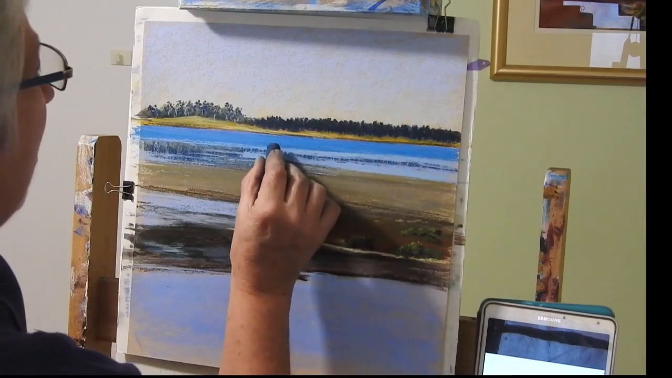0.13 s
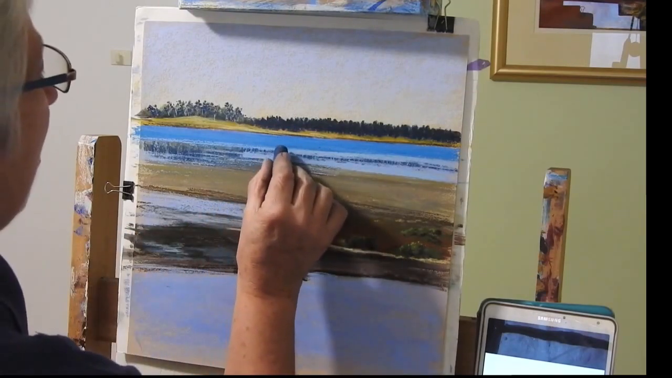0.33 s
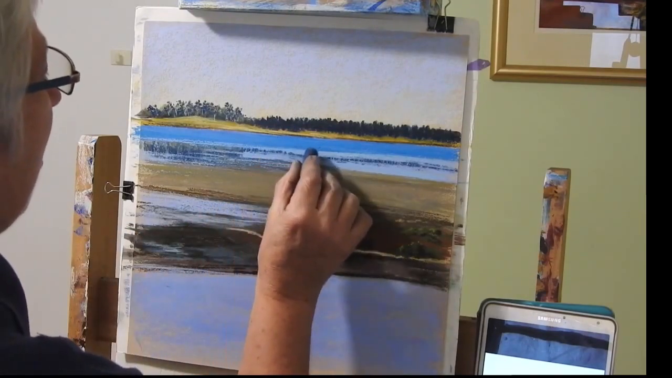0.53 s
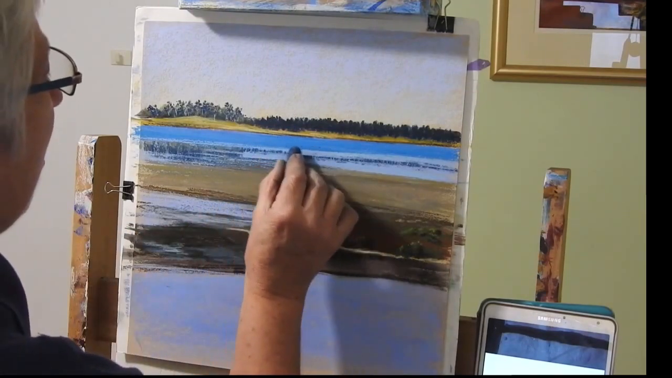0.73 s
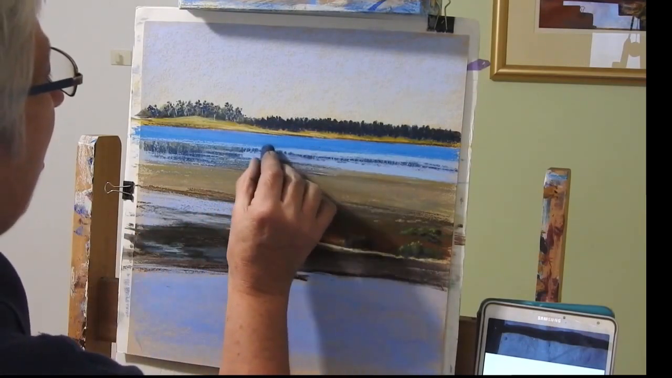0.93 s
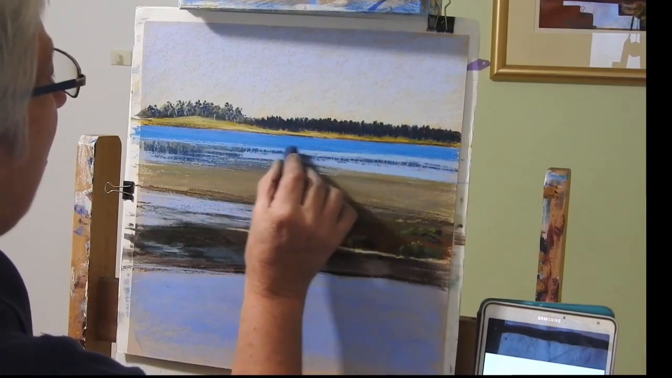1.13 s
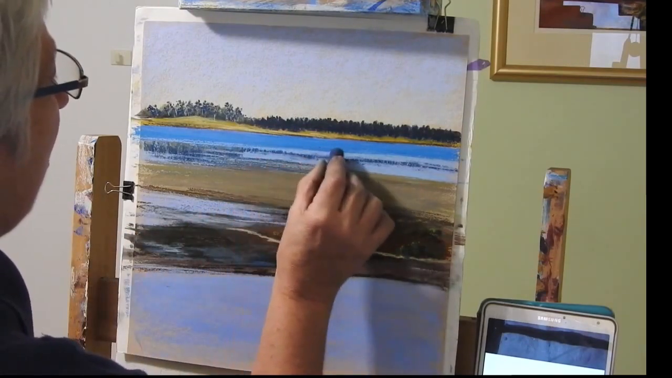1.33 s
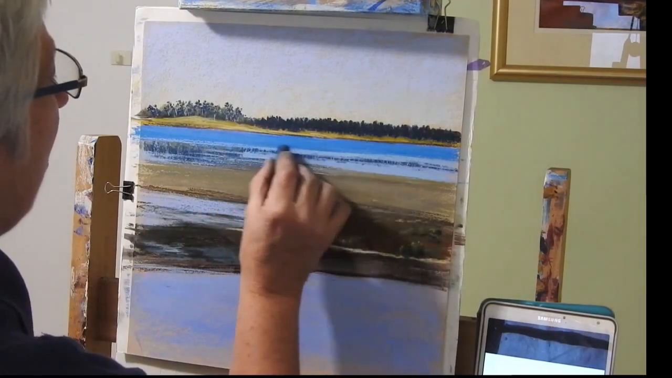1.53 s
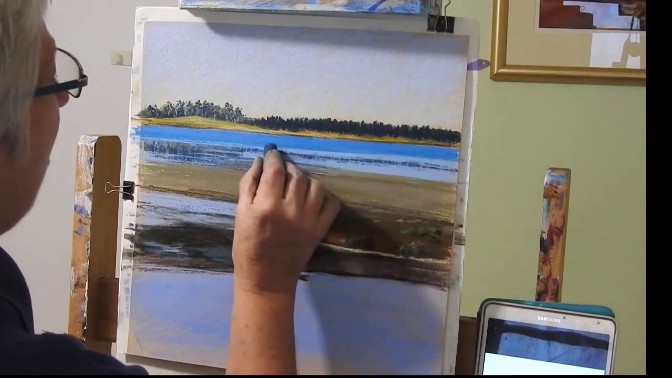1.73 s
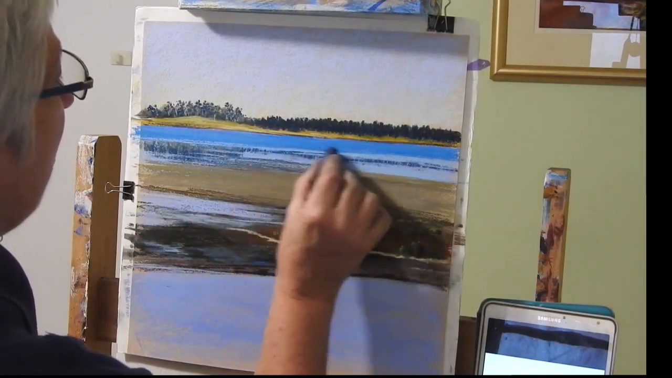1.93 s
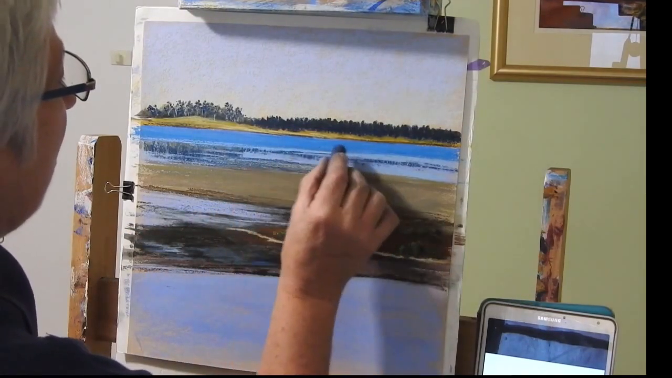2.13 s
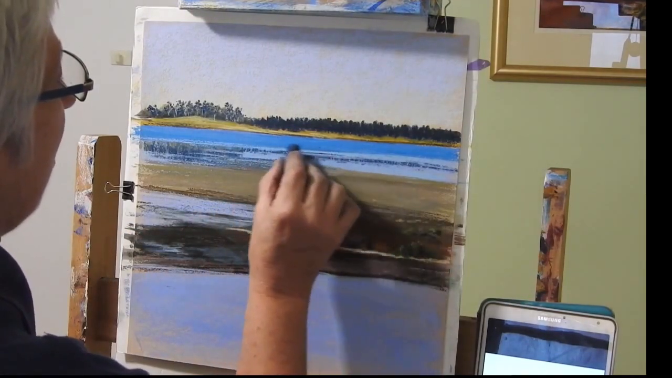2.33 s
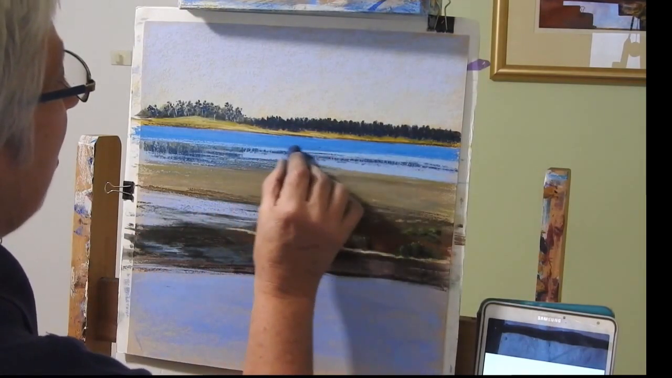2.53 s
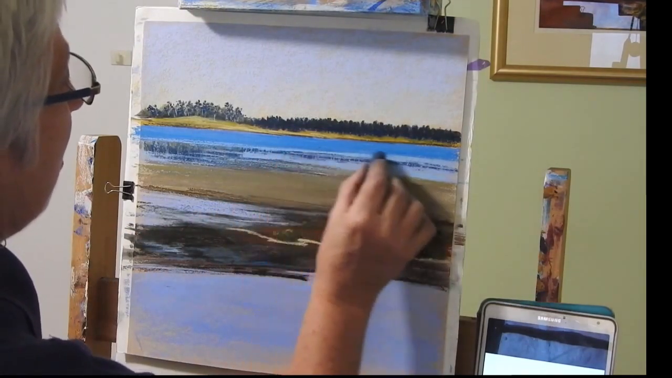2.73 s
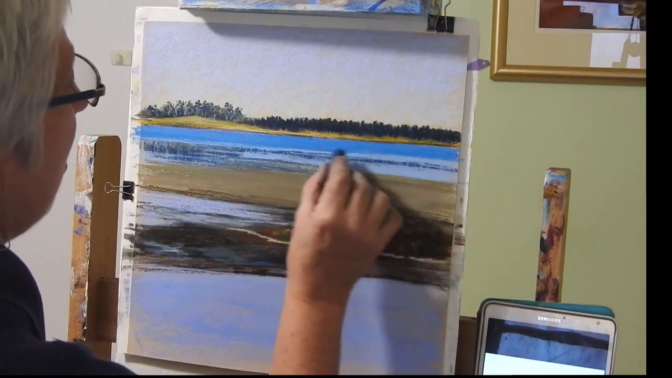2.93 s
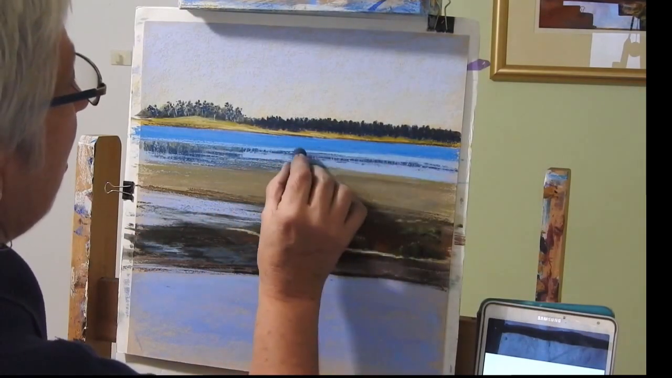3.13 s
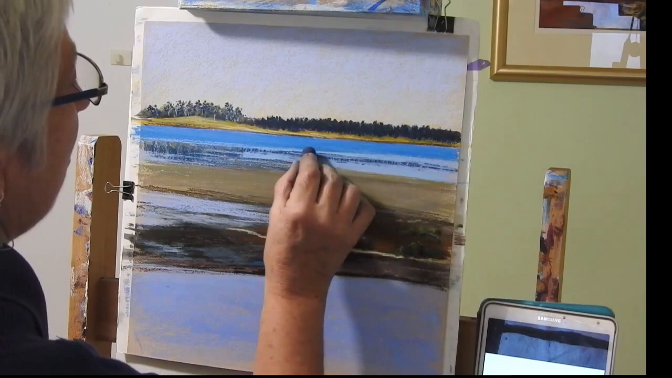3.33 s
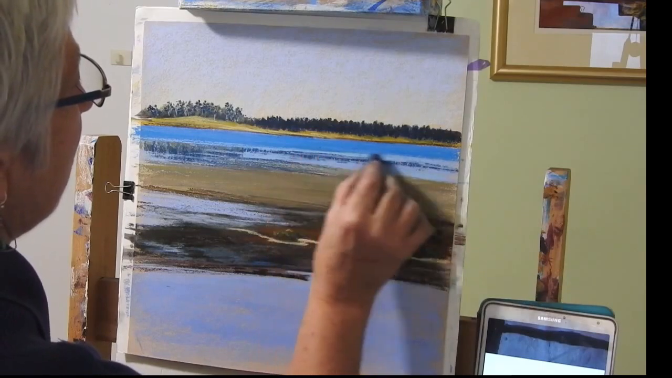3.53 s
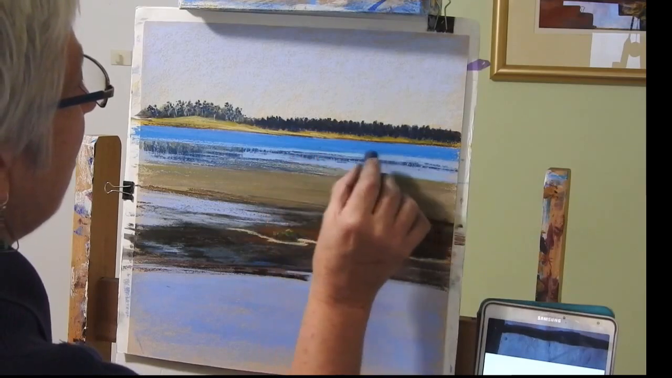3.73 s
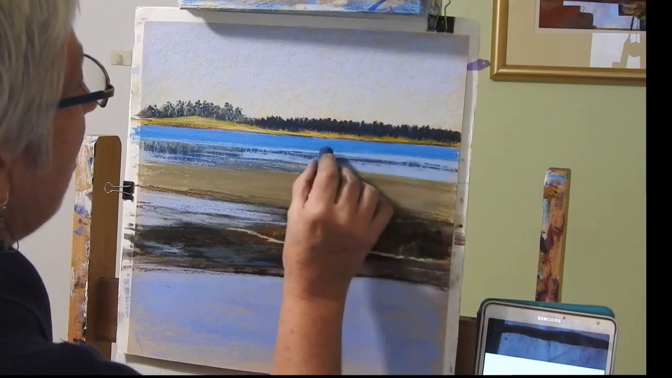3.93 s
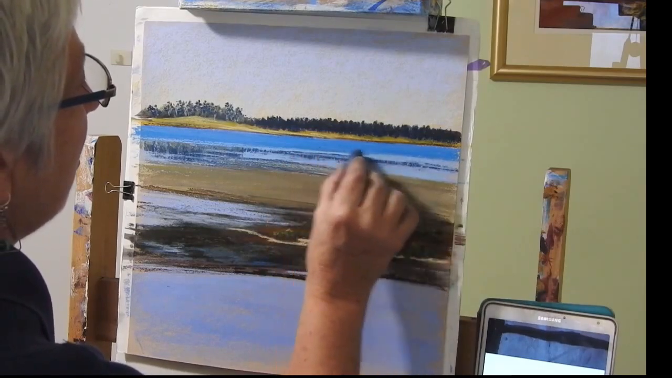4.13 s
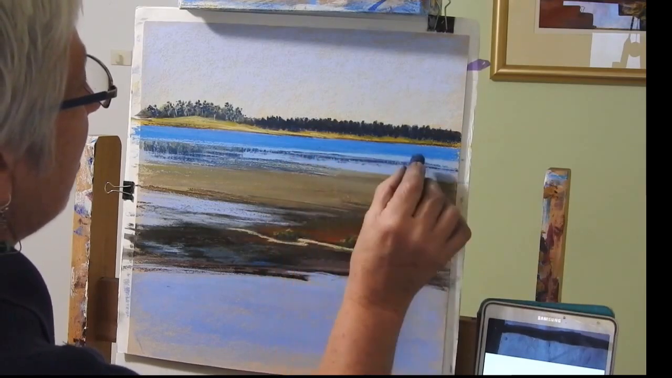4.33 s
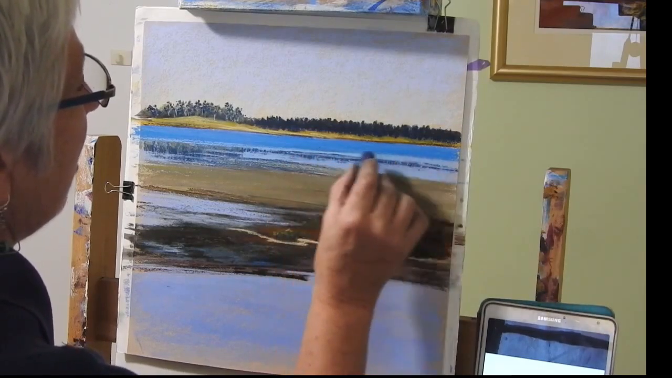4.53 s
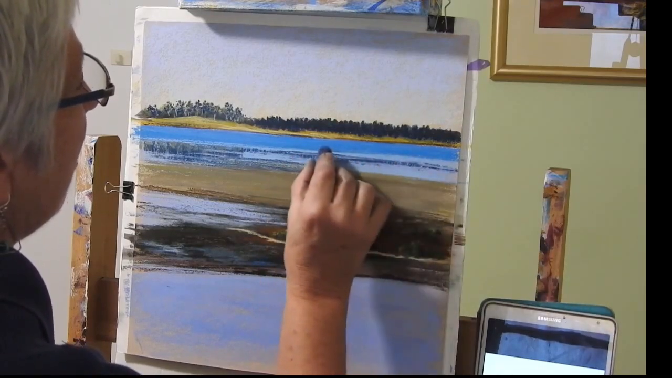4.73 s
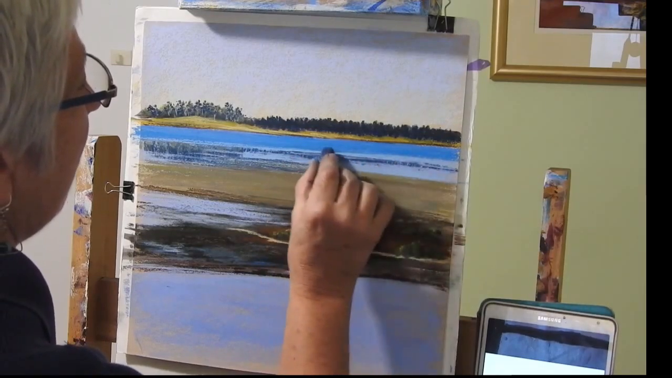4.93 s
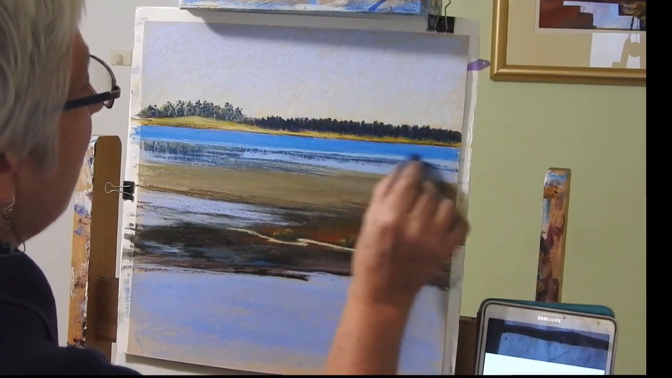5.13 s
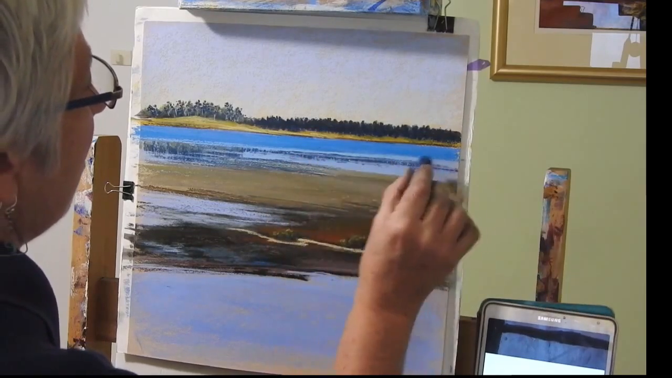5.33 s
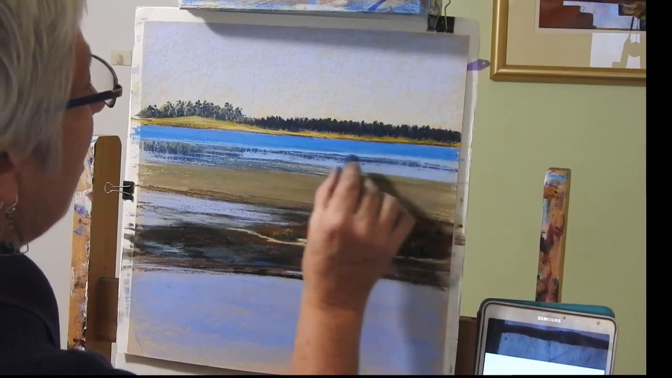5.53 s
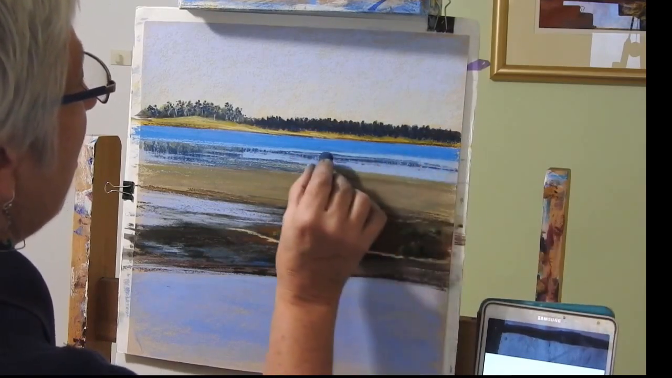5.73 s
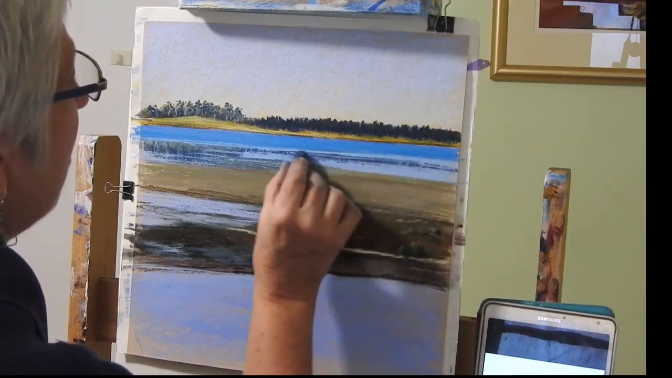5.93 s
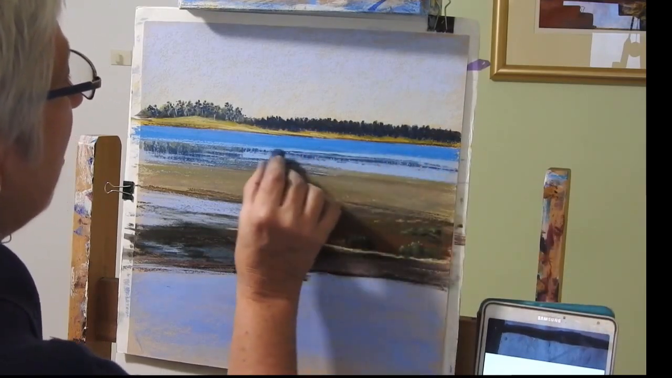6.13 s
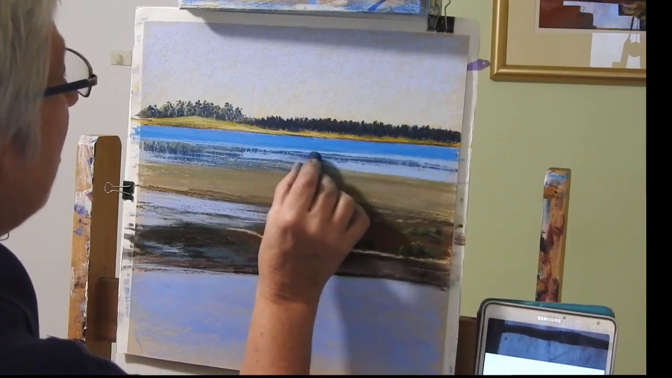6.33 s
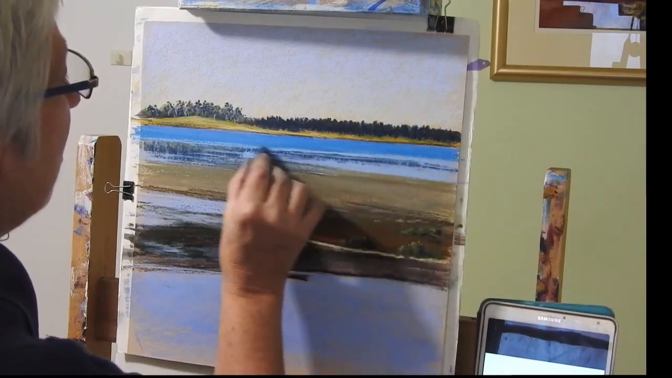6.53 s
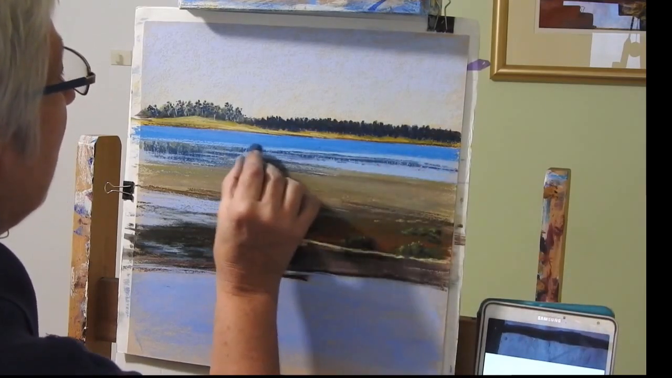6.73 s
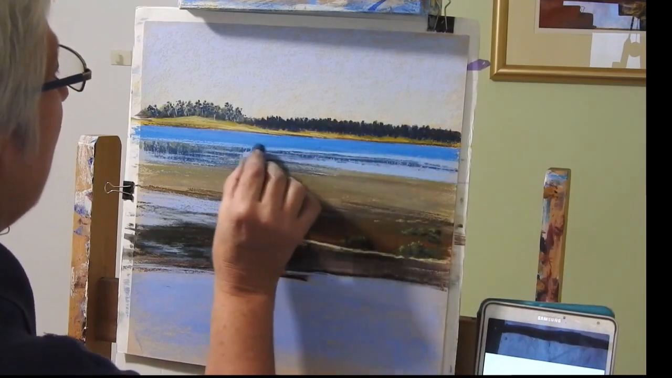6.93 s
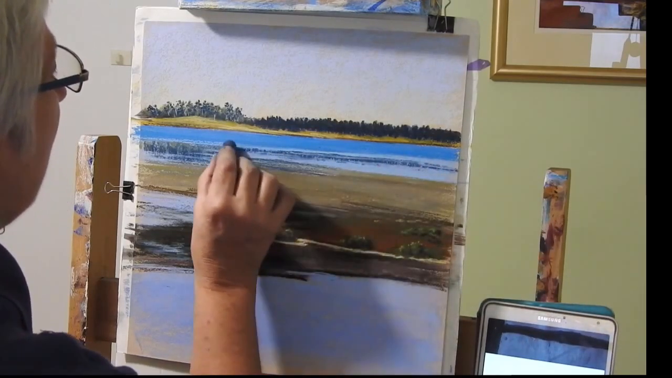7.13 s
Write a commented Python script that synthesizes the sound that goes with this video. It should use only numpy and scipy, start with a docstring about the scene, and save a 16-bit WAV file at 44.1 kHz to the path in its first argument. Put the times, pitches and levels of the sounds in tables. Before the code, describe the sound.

A low rumble and faint microphone hiss fill a quiet room throughout, with muffled engines droning outside, strongest in the first second. At about 0.8 seconds a soft pastel stick touches paper on an easel with a very brief scratch, followed by a longer stroke at 1.1. More strokes come at about 1.8, 2.5, 3.4, 4.1 and 5 seconds, each roughly a quarter of a second long. They are dry, gritty rasps with a crumbly hiss and a slightly hollow resonance from the board. The hand brushes the paper very faintly in between. In the last two strokes, at about 5.9 and 6.4 seconds, the edge of the stick snags and makes small knocks on the board. After 6.6 seconds only the background hum remains, slightly weaker, until the end just past 7 seconds.

```python
"""Soft pastel on toothed paper, on an easel board in a quiet room.
At first, engines outside drone through the walls over a low rumble and the hiss of two microphones.
From 0.8 s come nine short strokes: stick-slip friction makes the grit tick against the paper, and the
ticks excite the normal modes of board and sheet. In the last two strokes, from 5.9 s, the edge snags
and knocks on the board. After 6.6 s the background is left, a little weaker than it began."""
import sys
import numpy as np
from scipy import signal
from scipy.fft import rfft, irfft, next_fast_len
from scipy.io import wavfile
from scipy.ndimage import uniform_filter1d

SR = 44100
rng = np.random.default_rng(int(sys.argv[2]) if len(sys.argv) > 2 else 0)


def persist_wave(psi):
    """Save psi, clipped to +-1, as 16-bit WAV."""
    counts = np.round(np.clip(psi, -1, 1) * 32767).astype(np.int16)
    wavfile.write(sys.argv[1], SR, np.atleast_2d(counts).T)


N = 316197

# Strokes: touch t/s, full contact t/s, lift t/s, push level/dB at full contact and at lift, crumbling
# level/dB at full contact and at lift, flex gain/dB, bite gain/dB, start and end x/board width
STROKES = [(0.837, 0.843, 0.88, -50, -53, -61.5, -61, -4.5, -6, 0.45, 0.48),
           (1.008, 1.127, 1.313, -50, -52.5, -53.5, -52.5, -1.5, 0, 0.39, 0.65),
           (1.763, 1.871, 2.027, -44.5, -50, -51, -49, 1.5, 0, 0.43, 0.77),
           (2.529, 2.54, 2.783, -59.5, -55, -56.5, -47, -1.5, 2, 0.52, 0.75),
           (3.359, 3.46, 3.616, -49, -47, -50.5, -48, 0, -1.5, 0.59, 0.83),
           (4.03, 4.127, 4.298, -50.5, -54.5, -52, -49.5, -2.5, -0.5, 0.67, 0.74),
           (4.949, 5.063, 5.185, -43, -45, -49.5, -44.5, -0.5, -5.5, 0.7, 0.94),
           (5.933, 5.944, 6.07, -54, -55, -51, -50, -5.5, 5, 0.41, 0.39),
           (6.384, 6.46, 6.61, -49, -53, -50.5, -50, -3, 2.5, 0.53, 0.36)]
# The stick digs in: t/s, decay time/s, added push/dB, flex/dB, bite/dB, crumbling/dB
DIGS = [(0.855, 0.011, 3, 0, -5, 0), (1.11, .03, 3, -3, 1, 0), (1.209, 0.042, 1.5, 0, 5, 2),
        (1.276, .035, 1, 6, -3, -0.5), (1.858, 0.036, 7, 0, -13, 2), (1.96, 0.032, 6.5, -4, -2, 0),
        (2.011, 0.014, -3.5, 6, 10, 2.5), (2.533, 0.017, -1, 13, 8, -5), (2.6, 0.017, 8, 4, 1, -2),
        (2.639, 0.027, 4, 8, 0, 1), (2.678, 0.051, 9, -14, -3.5, 6.5), (3.456, 0.014, 7, -16, -10, -2),
        (3.512, 0.025, -2.8, 4, 9.5, 0.5), (3.538, 0.031, 4, -1.5, -9, 1), (3.596, 0.01, -5, 0, -10, 2.5),
        (4.045, 0.029, -3, 14, -11, -13), (4.101, 0.02, 3.5, 5, -3, -6), (4.197, .016, 9, -2, -5, 2.5),
        (4.218, 0.019, 1.5, 9.5, -5, -1), (4.235, .03, 0, 5, 0, 1.5), (5.015, 0.032, 1.5, -6, 3, 4),
        (5.045, 0.033, 1, 0, -4, -1.5), (4.982, 0.024, 1, 4.5, 8, 1), (5.102, 0.036, 1.5, 4, -5, -3),
        (5.19, 0.018, -9, -2, 4, 3), (5.952, 0.0044, 5.5, -1, -2, -2), (6.0, .012, 1, -7, 3, -1),
        (6.025, 0.02, 5.5, 7, -1.5, 2.5), (6.465, 0.013, 9, -16, -11, -4), (6.484, 0.0088, -1, -1, -7, -3),
        (6.567, 0.012, 10.5, -10, -9, -0.5), (6.581, 0.013, 4, 3, -1, 0.5)]
# The edge snags and snaps free: t/s, level/dB
SNAGS = [(5.945, -23), (6.463, -12), (6.477, -17), (6.562, -21), (6.579, -25)]
# Left-right coherence of the strokes: f/Hz, coherence
STROKE_COHERENCE = [(60, 1), (180, 1), (550, 0.98), (1650, 0.88), (4970, 0.627), (15000, 0.15)]
# Their balance: f/Hz, left minus right level/dB
STROKE_BALANCE = [(60, 8), (180, 3.5), (550, 2.5), (1650, 0.5), (4970, 0.5), (15000, -0.5)]


def strokes():
    """Stick-slip friction: the pastel judders along under a shifting grip, driving board and paper."""
    out = np.zeros((2, N))
    for touch, full, lift, push_full, push_lift, crumb_full, crumb_lift, flex, bite, *path in STROKES:
        t = np.arange(touch, lift + 0.36, 1 / SR)
        place = np.interp(t, (full - .03, lift + 0.011), path) + 0.035 * wander(len(t), 0.045)
        dig_push, dig_flex, dig_bite, dig_crumble = sum(
            np.outer(extra_db, pulse(t, at, np.where(t < at, 0.59 * decay, decay)))  # faster rise
            for at, decay, *extra_db in DIGS)
        push_db = dig_push + contact(t, full, lift, push_full, push_lift, step_db=-4, fall_db_per_s=313)
        crumble_db = dig_crumble + contact(t, full + 0.016, lift, crumb_full, crumb_lift,
                                           step_db=-5.5, fall_db_per_s=278)
        flex_db = flex + dig_flex + 1.2 * wander(len(t), 0.041)
        bite_db = bite + dig_bite + 1.2 * wander(len(t), 0.041)
        judder = gain_of(0.42 * wander(len(t), 0.0091))
        knocks = sum(gain_of(db) * pulse(t, at, width_s=0.00013) for at, db in SNAGS)
        start = round(t[0] * SR)
        for channel in out:
            channel[start:start + len(t)] += (scrape(push_db, flex_db, bite_db, place, judder, knocks)
                                              + crumbling(crumble_db, place, judder))
    return stereo(*(out + gain_of(-10.5) * reflections(out)), STROKE_COHERENCE, STROKE_BALANCE)


def contact(t, full, lift, full_db, lift_db, step_db, fall_db_per_s):
    """Contact envelope in dB: a light touch grows, drifts, then decays exponentially after the lift."""
    level_db = np.interp(t, (t[0], full, lift, lift + .013),
                         (full_db - 18, full_db, lift_db, lift_db + step_db))
    onset_db = -30 * np.exp(-(t - t[0]) / 0.0019)
    return level_db + onset_db - fall_db_per_s * np.maximum(t - lift, 0)


# Board modes: f/Hz, bandwidth/Hz, level/dB, half wavelengths across the board, antinode x/board width
BOARD_MODES = [(211, 30, -6, 0.96, 0.84), (299, 36, -6, 1.5, 0.61), (351, 24, 5, 0.63, 0.99),
               (401, 40, -4.5, 0.41, .75), (503.5, 24, 7.5, 0.47, -.3), (596, 34, 0, 0.78, -.1),
               (701, 39, -4, 0.98, 0.08), (790, 39, -5, 2, 0.76), (911.5, 31, -.5, 1.7, 0.64),
               (1011, 23, -2, 0.83, 0.97), (1138, 30, 4.5, 0.79, 0.16), (1297, 55, -1, 0.56, -.25),
               (1428, 34, 0, 1.93, 0.69), (1708, 70, -3.5, 0.48, -.12), (1885, 37, -14, .5, 0.4),
               (2034, 52, -8, .5, -.25), (2440, 55, -11, 2.5, 0.6), (2850, 40, -10, 0.83, 0.4)]
# Rasp of the paper between the modes: f/Hz, relative spectral level/dB
RASP_SPECTRUM = [(250, -29), (400, 0), (800, 4.5), (1600, 9), (2000, -21), (3000, -30), (4000, -15),
                 (6000, -107)]


def scrape(push_db, flex_db, bite_db, place, judder, knocks):
    """Forced vibration: ticks rasp and ring the board; flex weights its low modes, bite its high ones."""
    grains = ticks(len(place), per_s=8000, spread_db=0.32) * judder
    force = grains * gain_of(push_db + 20.5) + knocks
    board = ring(force * gain_of(flex_db), BOARD_MODES[:6], place)
    board += ring(force, BOARD_MODES[6:11], place)
    board += ring(force * gain_of(bite_db), BOARD_MODES[11:], place)
    rasp = gain_of(push_db + 0.21 * bite_db - 7.5) * coloured(grains, RASP_SPECTRUM)
    return board + rasp


# Fine grit: f/Hz, relative spectral level/dB
GRIT_SPECTRUM = [(1470, -23), (2500, -6.5), (2720, -9.5), (2800, -3.5), (3030, -23), (3950, -9), (5400, -6),
                 (7440, -7), (10300, -4), (12200, -17), (15500, -99)]
# Paper and stick modes: f/Hz, bandwidth/Hz, level/dB, half wavelengths, antinode x/board width
SHEET_MODES = [(3130, 110, 0, 4.3, 0.44), (3414, 60, -1, 7.8, 0.54), (4830, 100, -16, 3.9, 0.45),
               (5420, 140, -2.5, 5, 0.45), (6850, 160, -6, 6.2, 0.48), (7960, 270, -18, 6.8, 0.47),
               (9150, 220, -5, 5.2, 0.5), (10450, 220, -2, 4.3, 0.38)]


def crumbling(level_db, place, judder):
    """Impact excitation: pastel crumbles in clumps of tiny clicks that hiss and ring paper and stick."""
    dust = ticks(len(place), per_s=20000, spread_db=0.37) * judder ** .5
    dust *= gain_of(1.5 * wander(len(place), 0.0077))  # clumps
    grit = gain_of(level_db + 2.5) * coloured(dust, GRIT_SPECTRUM)
    return grit + ring(dust * gain_of(level_db + 6.0), SHEET_MODES, place, patch_db=4.5)


def ticks(count, per_s, spread_db):
    """Shot noise: grains catch on the tooth of the paper at random instants, with random strength."""
    size = gain_of(spread_db * np.minimum(rng.exponential(1, count), 4)) * rng.standard_normal(count)
    return unit_rms(size * (rng.random(count) < per_s / SR))


def ring(force, modes, place, patch_db=1.5):
    """Modal superposition: each mode is driven strongly at an antinode and weakly at a node."""
    out = np.zeros(len(place))
    for hz, width, db, half_waves, antinode in modes:
        catch = gain_of(patch_db * wander(len(place), .015))  # each mode catches and loses the grit
        coupling = .22 + np.cos(np.pi * half_waves * (place - antinode)) ** 2
        out += gain_of(db) * resonate(force * catch * coupling, hz, width)
    return out


def reflections(x, reverb_s=0.11):
    """Reverberation: sparse echoes of random sign from easel and walls decay exponentially."""
    t = np.arange(round(.25 * SR)) / SR
    taps = rng.choice([-1., 1.], (2, len(t))) * (rng.random((2, len(t))) < .04)
    taps *= (t > .003) * gain_of(-60 * t / reverb_s)
    taps = signal.lfilter([1], [1, -.6], taps)  # soft furnishings absorb the treble
    return signal.fftconvolve(x, taps / np.linalg.norm(taps[0]), axes=1)[:, :N]


# Engine tones: start t/s, end t/s, start f/Hz, end f/Hz, start level/dB, end level/dB
ENGINE_TONES = [(-.15, .18, 74.3, 75.3, -34, -34), (.16, .46, 70.5, 70.5, -33.5, -34.5),
                (.5, .95, 72.7, 73.1, -32.5, -39), (-.2, .12, 146, 145, -33, -37),
                (.47, .82, 144.5, 146, -38, -37.5), (.8, 1.04, 146, 146, -44, -44),
                (.9, 1.27, 83.5, 84, -38, -44), (1.48, 2.2, 84.7, 83.5, -43, -50),
                (1.15, 1.44, 163.5, 164.5, -46, -45), (1.46, 1.77, 164.9, 163.9, -40.5, -40),
                (1.74, 2.1, 165.4, 164.5, -45, -52), (1.58, 1.88, 248, 250, -56, -53),
                (.2, .45, 98.7, 98.7, -43, -43), (1.5, 6.5, 71.5, 71.1, -54, -53),
                (-.1, 3, 99, 100.3, -50, -50), (1.05, 7.3, 143, 141.6, -51.5, -56),
                (2.7, 4.95, 109.8, 109.5, -50, -49), (4.55, 6, 92.7, 90.6, -42.5, -44),
                (6.05, 6.48, 88.5, 90, -48, -46), (6.5, 7.3, 88.7, 89.2, -46, -43),
                (1, 3.4, 188.8, 188.4, -59, -60), (3.4, 4.9, 186, 184.5, -57, -55),
                (4.9, 7.3, 183, 176.2, -62, -60), (2.3, 3.6, 213, 210, -62, -63),
                (3.6, 5.8, 209, 206.2, -66, -58)]


def engines(swell_s=.19):
    """Amplitude and phase modulation: tones of passing vehicles swell, glide and fade; long ones waver."""
    out = np.zeros(N)
    for start, end, hz, end_hz, db, end_db in ENGINE_TONES:
        first, last = max(round(start * SR), 0), min(round(end * SR), N)
        t = np.arange(first, last) / SR
        wobble = 0.023 * wander(len(t) + SR, 0.045)[SR:]
        waver_db = 2.1 * np.clip(end - start - .4, 0, 1) * wander(len(t), 0.19)
        fade = np.sin(np.pi / 2 * np.clip(np.minimum(t - start, end - t) / swell_s, 0, 1))
        cycles = np.cumsum(np.interp(t, (start, end), (hz, end_hz))) / SR + rng.random() + wobble
        level_db = np.interp(t, (start, end), (db, end_db)) + waver_db
        out[first:last] += np.sqrt(2) * fade * gain_of(level_db) * np.sin(2 * np.pi * cycles)
    return out * gain_of([[1.4], [-1.4]])


# Traffic and house air: f/Hz, relative spectral level/dB
RUMBLE_SPECTRUM = [(12, -67), (20, -33), (35, -16.5), (54, -5.5), (80, -1.5), (100, -6.5), (119, -9),
                   (150, -7.5), (177, -16), (214, -17.5), (237, -25.5), (393, -28), (527, -27.5),
                   (585, -29.5), (947, -30), (3000, -44), (3900, -88), (6600, -120)]
# Their envelope: t/s, level/dB
RUMBLE_ENVELOPE = [(0, -45.5), (3.5, -45.5), (7.17, -47.5)]
# Fuzzy steady hums of the room: f/Hz, bandwidth/Hz, level/dB
ROOM_HUMS = [(334, 46, -73.5), (533, 16, -65), (685, 67, -69), (832, 21, -70), (926.5, 31, -71),
             (1060, 36, -94), (1370, 54, -82)]
# Left-right coherence of rumble and hums: f/Hz, coherence
RUMBLE_COHERENCE = [(60, 1), (180, 0.83), (550, 0.63), (1650, 0.46), (4970, 0.06), (15000, 0.08)]


def rumble():
    """Spatial coherence: low noise and hums reach both microphones most alike at long wavelengths."""
    level = gain_of(np.interp(np.arange(N) / SR, *np.transpose(RUMBLE_ENVELOPE)) + 0.8 * wander(N, 0.079))
    pair = []
    for noise in rng.standard_normal((2, N)):
        hums = sum(gain_of(db) * unit_rms(resonate(noise[::-1], hz, width)) for hz, width, db in ROOM_HUMS)
        pair.append(level * coloured(noise, RUMBLE_SPECTRUM) + hums)
    return stereo(*pair, RUMBLE_COHERENCE, balance=[(60, 2.3), (300, 3.1), (1500, 2.4)])


# Faint brushes of the hand on the paper: t/s, level/dB, 1/e half-width/s
HAND_BRUSHES = [(0.178, -60, 0.028), (2.277, -56, 0.016), (4.038, -57, 0.014), (4.93, -70, 0.017),
                (6.152, -56, 0.0164), (3.9, -62, .03), (4.45, -62, .03), (5.6, -62, .03)]


def brushing():
    """Modulated band noise: the midrange of the room stirs faintly and swells as the hand brushes."""
    t = np.arange(N) / SR
    band = coloured(rng.standard_normal(N), [(250, -17), (450, 6.5), (1300, 0.5), (2200, -34)])
    brushes = sum(gain_of(db) * pulse(t, at, width) for at, db, width in HAND_BRUSHES)
    stir = gain_of(-72.0 + 3.0 * wander(N, 0.061))
    return (stir + brushes) * band * gain_of([[1], [-1]])


# Microphone noise: f/Hz, relative spectral level/dB
HISS_SPECTRUM = [(880, -22), (1500, -2), (1750, -11), (2030, -5), (3030, -4.5), (4100, -2.5), (6180, -3),
                 (15000, -16.5), (15500, -44)]


def hiss():
    """Self-noise: each microphone adds its own, uncorrelated with the other."""
    return gain_of(-59.5) * coloured(rng.standard_normal((2, N)), HISS_SPECTRUM)


def stereo(a, b, coherence, balance):
    """Partial coherence: left and right share signal a and take signal b in antiphase."""
    common = filtered(a, lambda hz: np.sqrt((1 + curve_at(coherence, hz)) / 2))
    apart = filtered(b, lambda hz: np.sqrt((1 - curve_at(coherence, hz)) / 2))
    return np.array([filtered(common + side * apart, lambda hz: gain_of(side * curve_at(balance, hz) / 2))
                     for side in (1, -1)])


def resonate(x, hz, width):
    """Damped oscillator: a two-pole resonance with its bandwidth in Hz."""
    r = np.exp(-np.pi * width / SR)
    return signal.lfilter([1, 0, -1], [1, -2 * r * np.cos(2 * np.pi * hz / SR), r * r], x) * (1 - r * r) / 2


def coloured(x, spectrum):
    """Spectral shaping, normalised to unit RMS."""
    return unit_rms(filtered(x, lambda hz: gain_of(curve_at(spectrum, hz))))


def filtered(x, gain):
    """Zero-phase filtering by a gain that depends on frequency."""
    size = next_fast_len(x.shape[-1])
    return irfft(rfft(x, size) * gain(np.fft.rfftfreq(size, 1 / SR)), size)[..., :x.shape[-1]]


def curve_at(points, hz):
    """Interpolation on a logarithmic frequency axis."""
    f, value = np.transpose(points)
    return np.interp(np.log(hz + 1), np.log(f + 1), value)


def wander(count, seconds):
    """Slow random fluctuation: twice-averaged noise of unit RMS."""
    size = max(round(seconds * SR), 1)
    return unit_rms(uniform_filter1d(uniform_filter1d(rng.standard_normal(count), size), size))


def pulse(t, at, width_s):
    """Gaussian pulse of unit height."""
    return np.exp(-((t - at) / width_s) ** 2)


def unit_rms(x):
    """Normalisation to unit mean power."""
    return x / np.sqrt(np.mean(x ** 2) + 1e-20)


def gain_of(db):
    """Amplitude ratio of a level."""
    return 10 ** (np.asarray(db) / 20)


def scene():
    """Linear superposition of the strokes and their background."""
    return strokes() + engines() + rumble() + brushing() + hiss()


def record(dry, cutoff_hz=15690):
    """Band limiting by a linear-phase low-pass filter."""
    lowpass = signal.firwin(2047, cutoff_hz, window=("kaiser", 9), fs=SR)
    return signal.oaconvolve(dry, lowpass[None], "same")


dry = scene()
out = record(dry)
persist_wave(out)
```